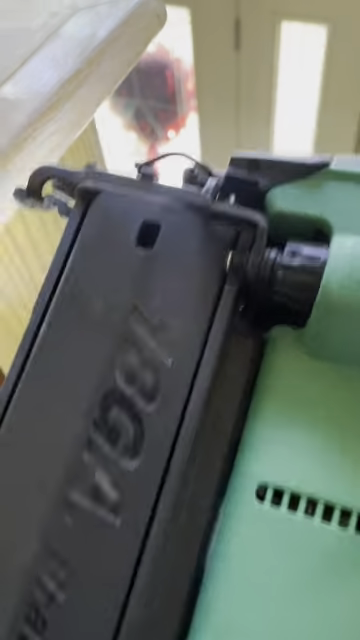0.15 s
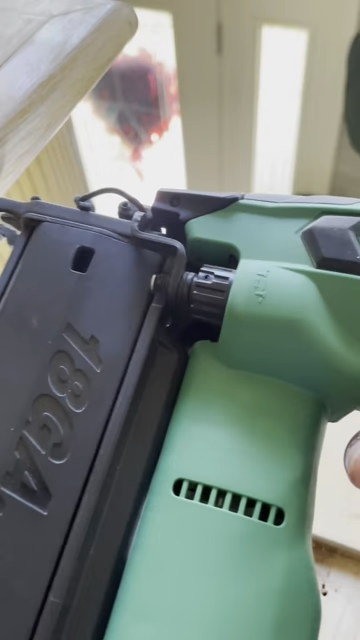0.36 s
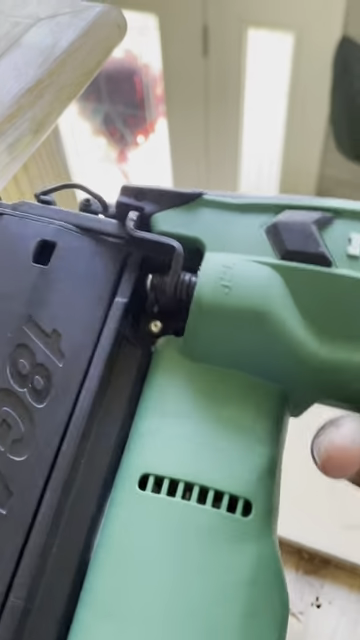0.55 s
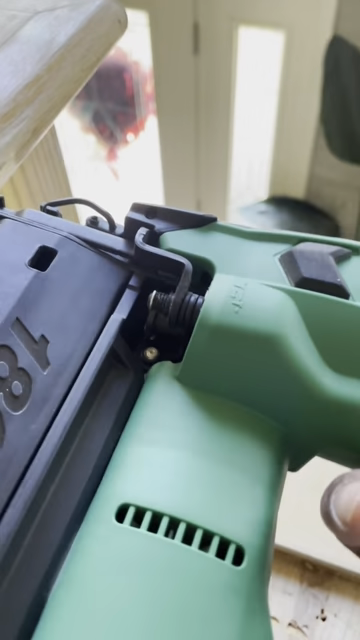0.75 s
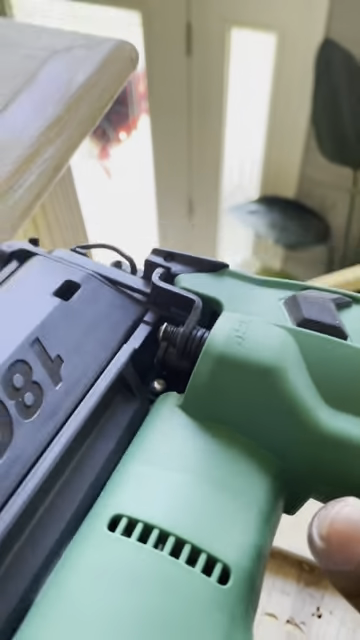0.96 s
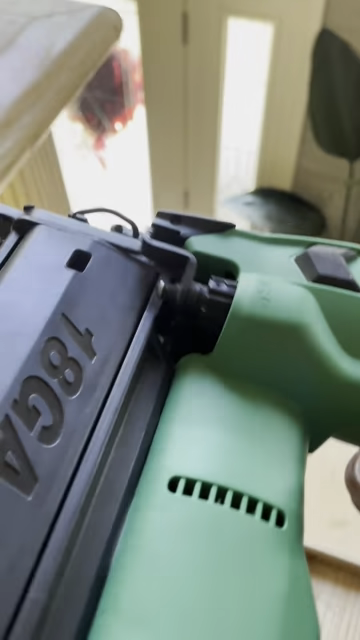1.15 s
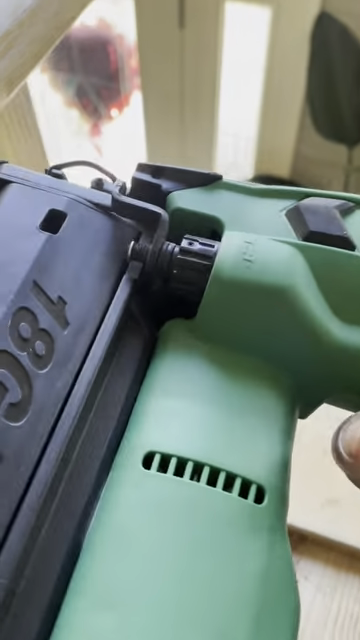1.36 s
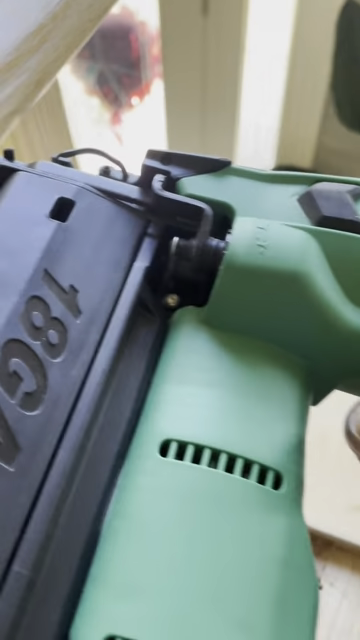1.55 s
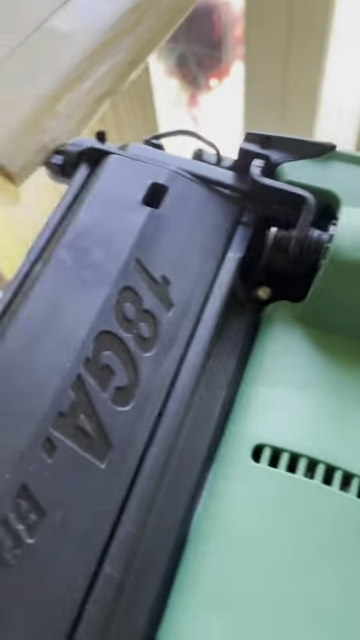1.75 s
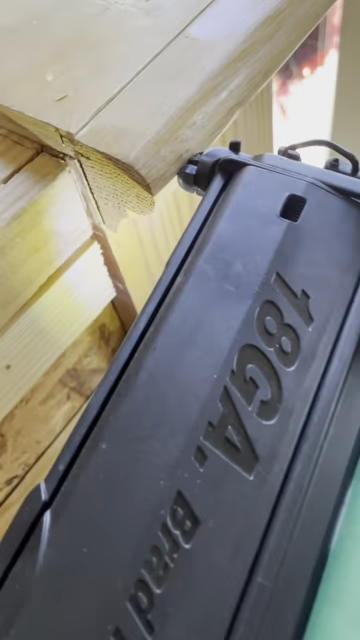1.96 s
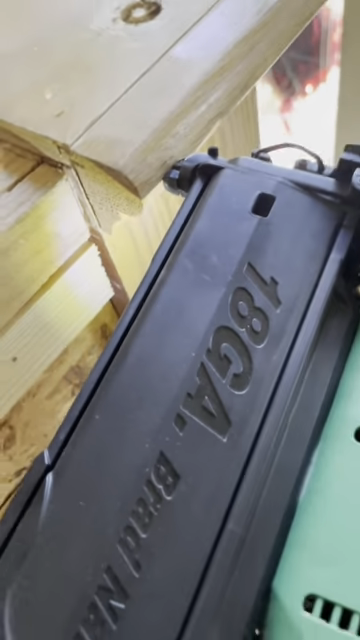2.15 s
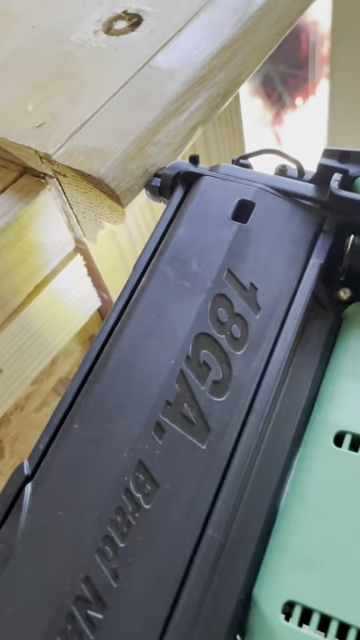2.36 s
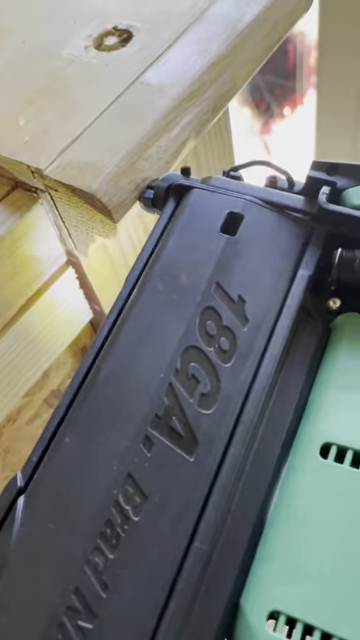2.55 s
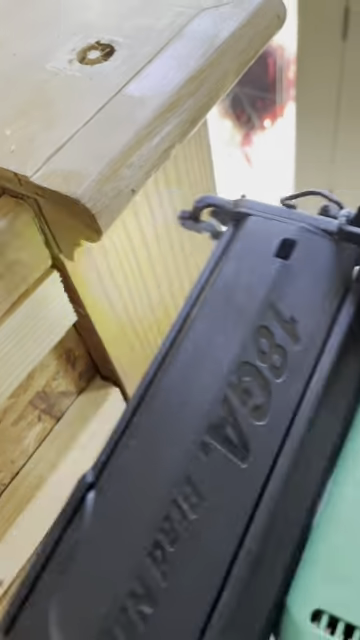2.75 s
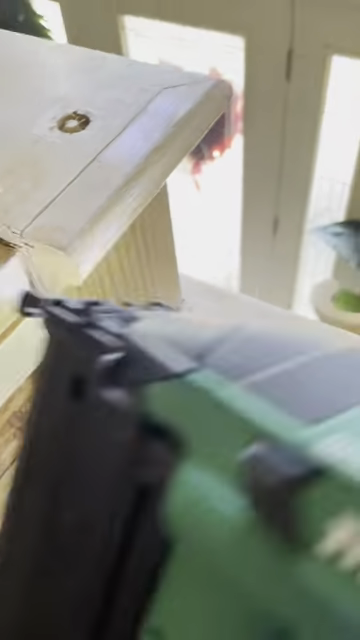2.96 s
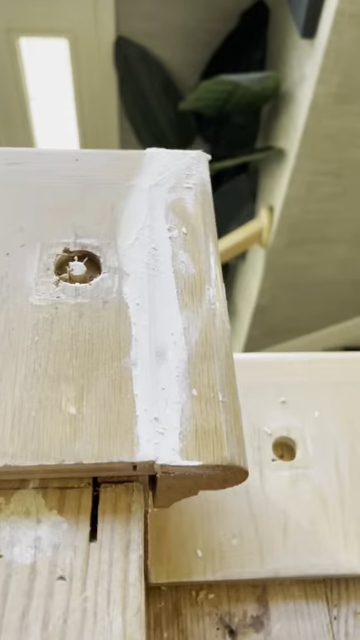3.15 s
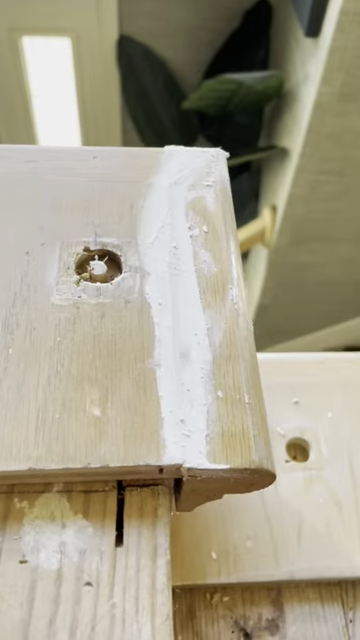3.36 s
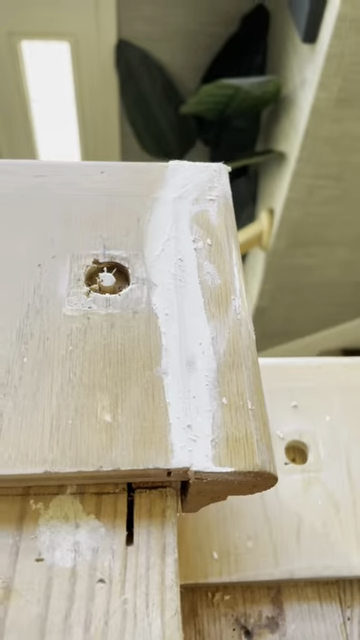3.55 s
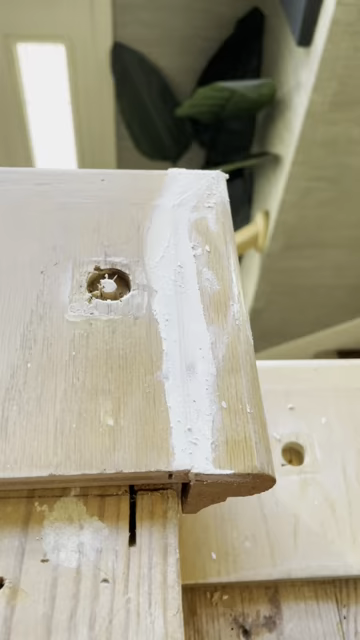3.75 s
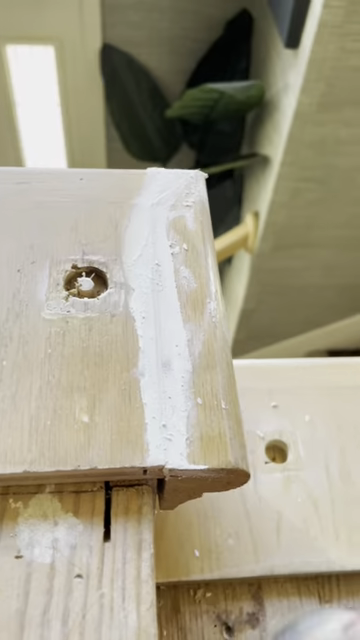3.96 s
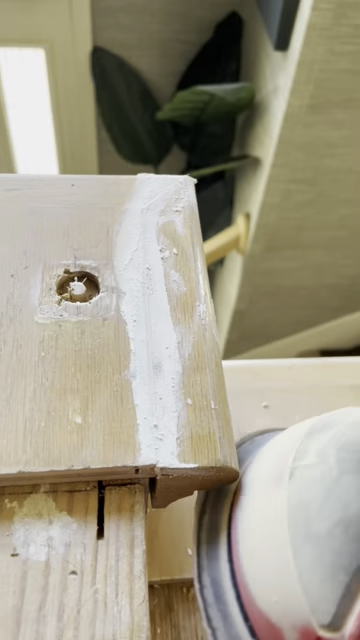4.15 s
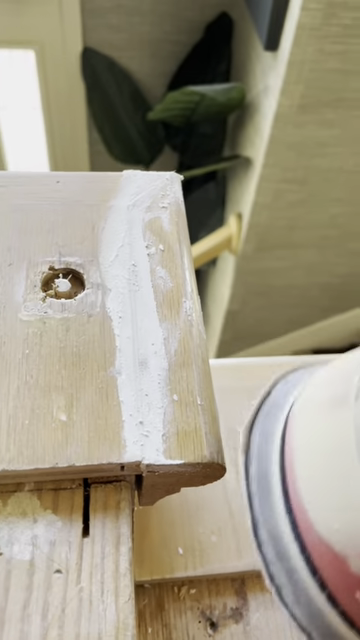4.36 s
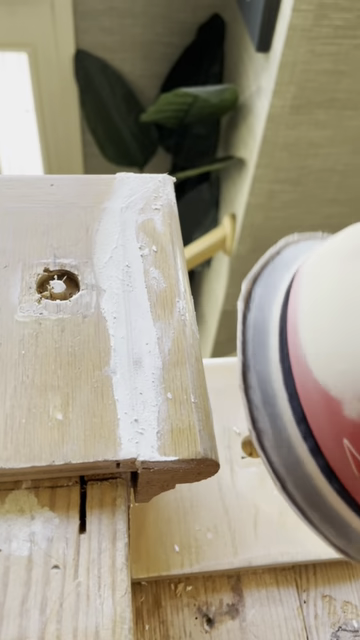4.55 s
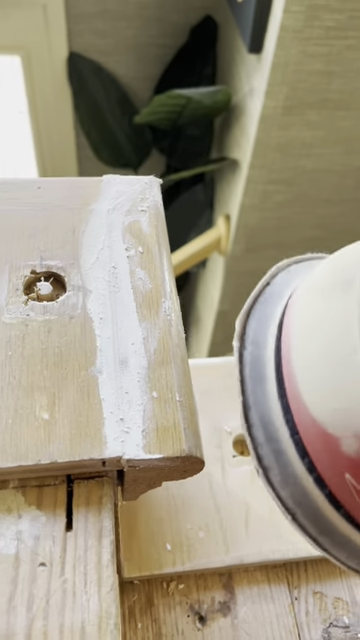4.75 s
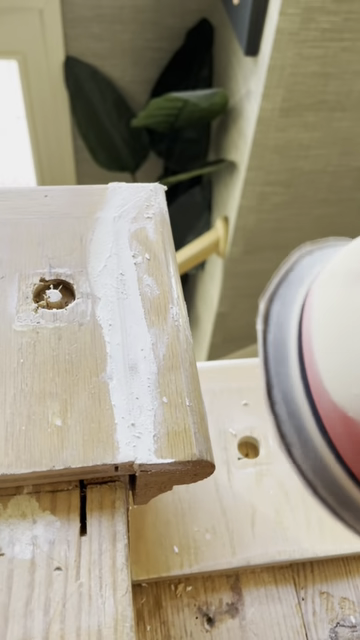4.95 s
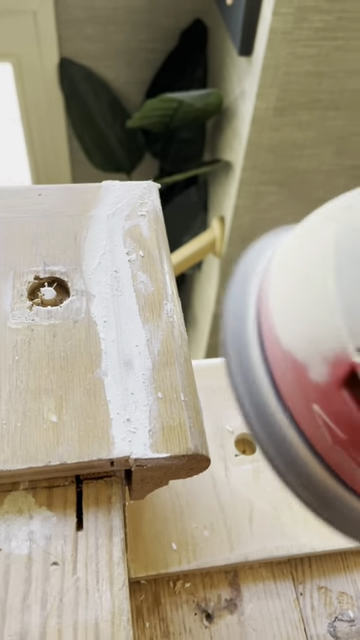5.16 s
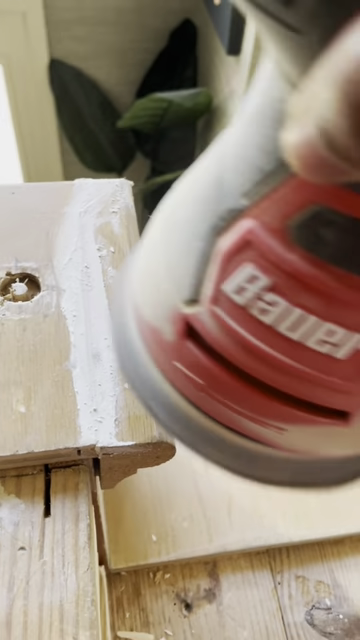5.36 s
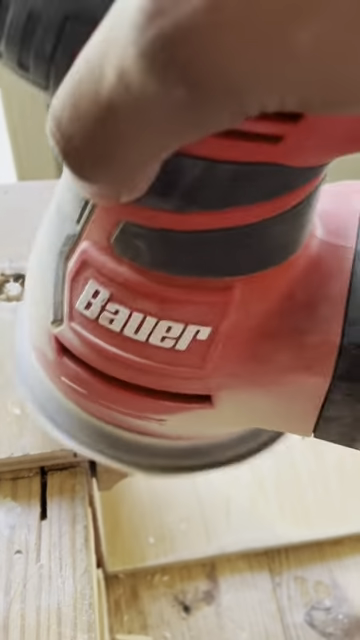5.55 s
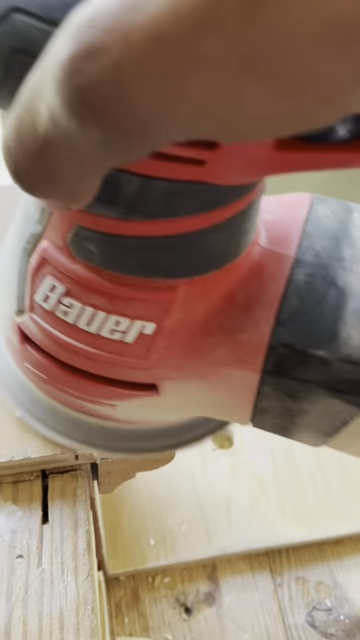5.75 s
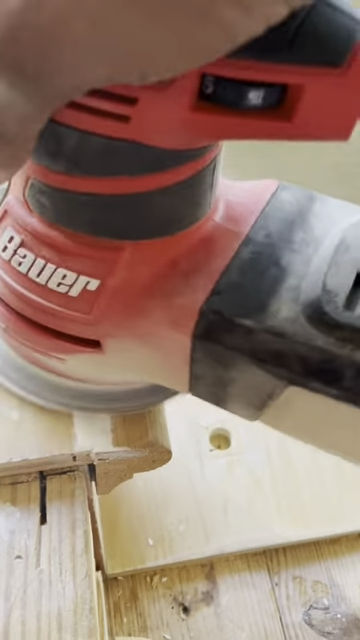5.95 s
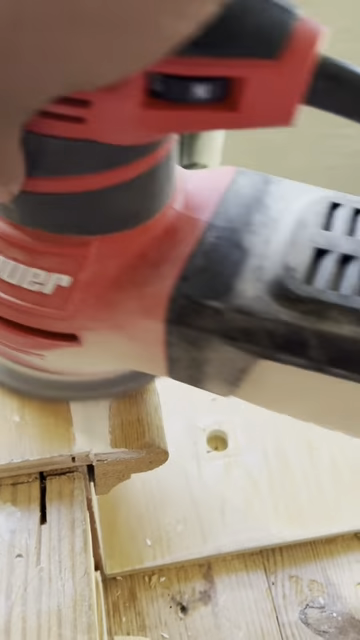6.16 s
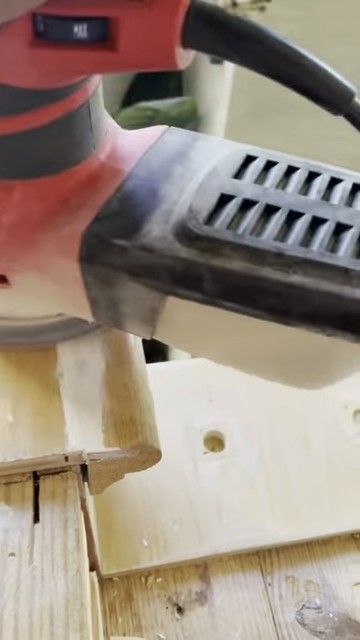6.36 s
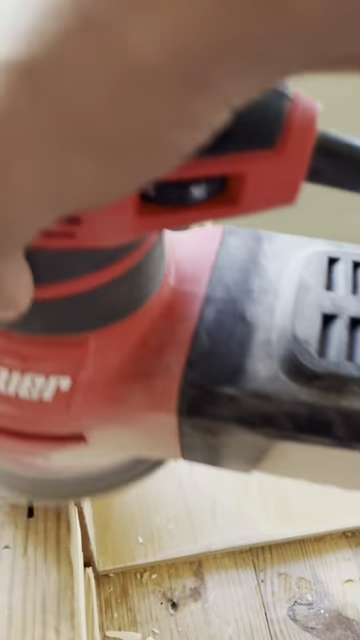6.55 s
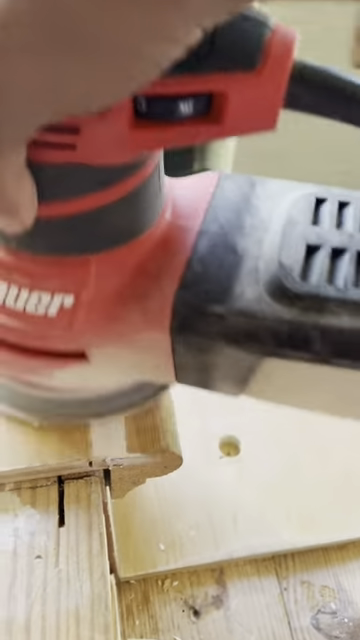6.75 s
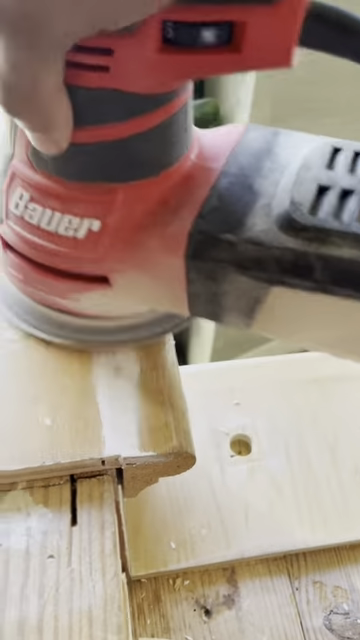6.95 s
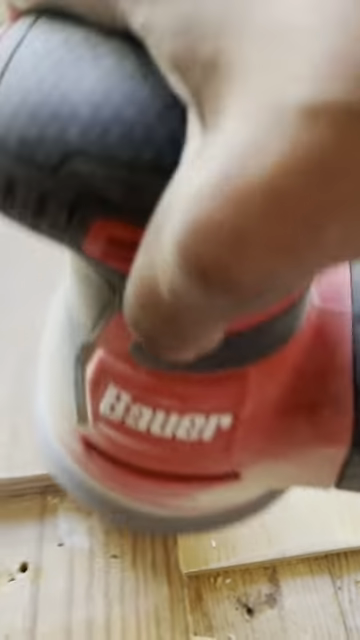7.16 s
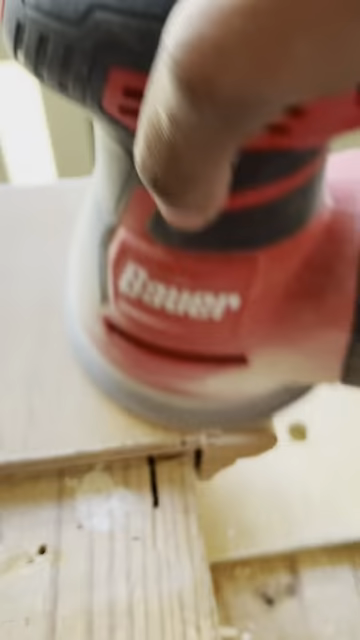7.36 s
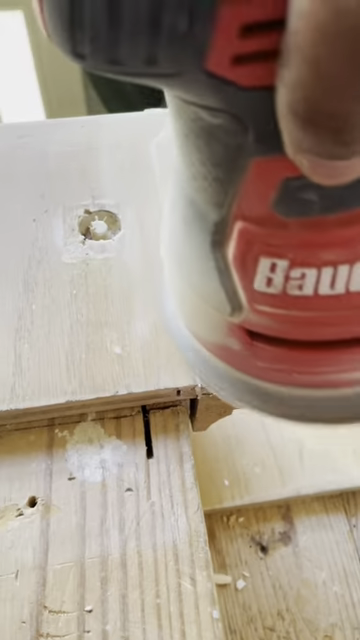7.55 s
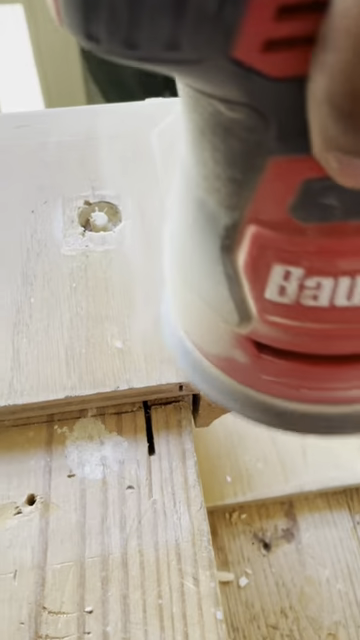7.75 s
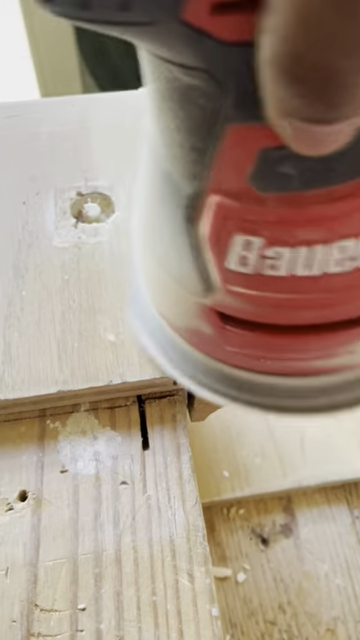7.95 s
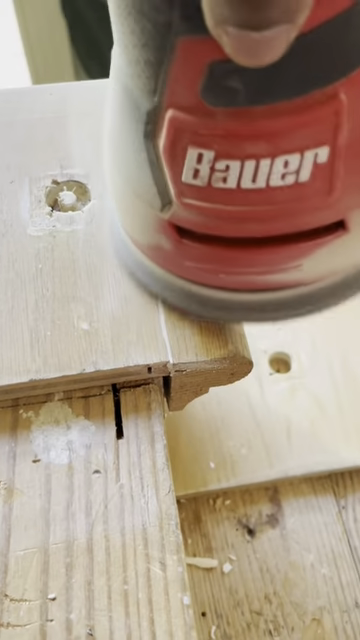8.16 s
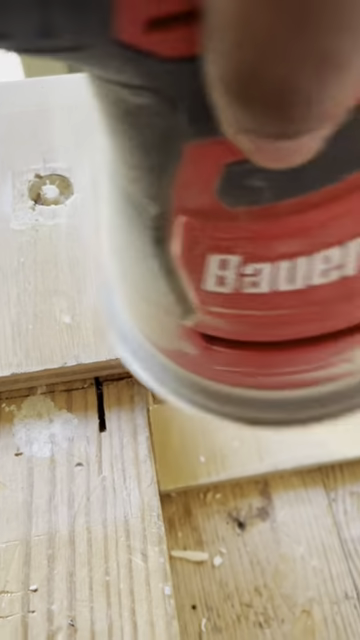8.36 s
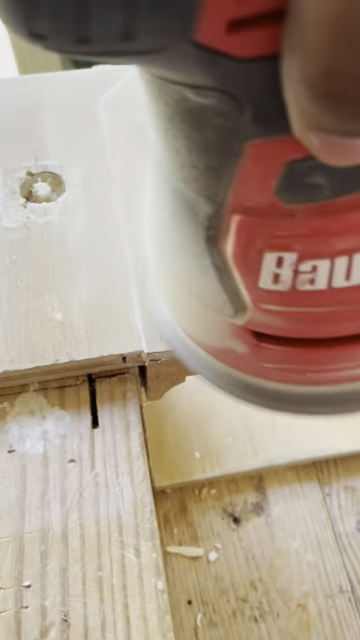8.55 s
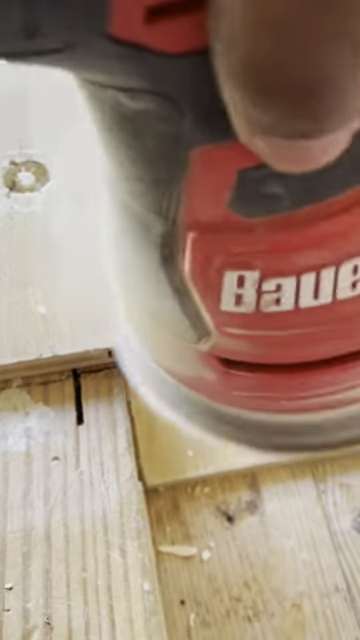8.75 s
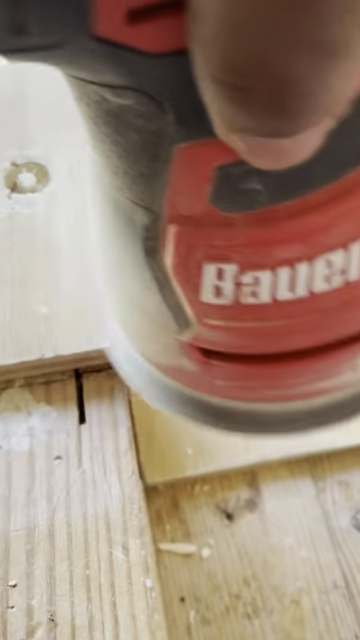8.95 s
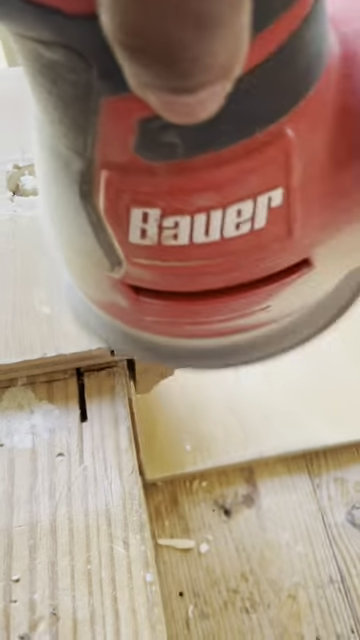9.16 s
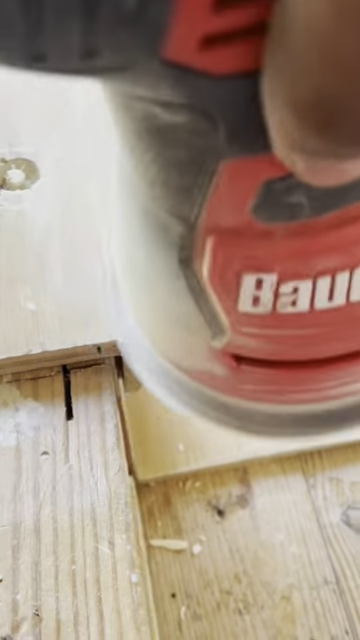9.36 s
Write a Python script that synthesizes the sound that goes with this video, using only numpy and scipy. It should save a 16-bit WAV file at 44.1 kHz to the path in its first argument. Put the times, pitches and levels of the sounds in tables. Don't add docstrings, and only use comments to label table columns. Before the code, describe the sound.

Plastic tool clicks, scrapes and one sharp knock on wood, a near-silent pause, then an electric sander spins up and buzzes steadily to the end.

```python
import sys
import numpy as np
from scipy import signal
from scipy.fft import rfft, irfft
from scipy.io import wavfile
from scipy.ndimage import uniform_filter1d

SR = 44100
rng = np.random.default_rng(int(sys.argv[2]) if len(sys.argv) > 2 else 0)


def transcribe(signal):
    frames = np.atleast_2d(signal).T
    limited = np.clip(frames, -1, 1)
    pcm = np.round(limited * 32767).astype(np.int16)
    wavfile.write(sys.argv[1], SR, pcm)


def ratio_of_db(decibels):
    return 10 ** (np.asarray(decibels, float) / 20)


N = 414540
T = np.arange(N) / SR
SIZE = 16384
STEP = 64
JOIN_S = 7.43


def evened(x):
    return x / np.sqrt(np.mean(x ** 2) + 1e-20)


def read(points, hz):
    f, value = np.transpose(points)
    return np.interp(np.log(hz + 1), np.log(f + 1), value)


def coloured(white, spectrum, lumps_db=0):
    hz = np.fft.rfftfreq(white.shape[-1], 1 / SR)
    octaves_below = np.maximum(np.log2(spectrum[0][0] / (hz + 1)), 0)
    octaves_above = np.maximum(np.log2((hz + 1) / spectrum[-1][0]), 0)
    shape_db = read(spectrum, hz) - 17 * (octaves_below + octaves_above) + lumps_db
    return evened(irfft(rfft(white) * ratio_of_db(shape_db), white.shape[-1]))


def stereo_noise(length=N):
    return rng.standard_normal((2, length))


def drift(hz, count, t=T):
    steps = rng.standard_normal((count, 4000))
    smooth = signal.sosfiltfilt(signal.butter(2, hz, fs=400, output="sos"), steps)
    return np.array([np.interp(t * 400, np.arange(4000), evened(row)) for row in smooth])


# (frequency [Hz], phase [rad])
LEAD = [(0, 0), (2000, .1), (3000, .9), (4200, 1.1), (4700, 2.3), (5250, 6.3), (9900, 9.42), (14600, 12.5)]
# (frequency [Hz], likeness [0-1])
SAME = [(60, 0.93), (250, 0.99), (500, 0.16), (1000, 0.83), (1800, 0.73), (3000, 0.98), (4700, 0.6),
        (5600, 0.92), (8000, 1), (10000, 0.095), (12500, 0.92), (14800, 0.88)]
# (frequency [Hz], level [dB])
LEAN = [(60, -2.5), (110, -3), (200, 2.0), (380, 5.5), (700, -5.5), (1290, 3.5), (2380, -0.5), (4400, -1.5),
        (8120, 0.0), (15000, 0.0)]


def ports(x, same=SAME):
    hz = np.fft.rfftfreq(N, 1 / SR)
    spread = np.arccos(np.clip(read(same, hz), 0, 1)) / 2
    direct, walls = rfft(x) * [np.cos(spread), np.sin(spread)]
    turn = np.exp(.5j * np.interp(hz, *np.transpose(LEAD))) * ratio_of_db(read(LEAN, hz) / 2)
    return irfft([(direct + walls) * turn, (direct - walls) / turn], N)


def swell(db, rise, fall, tail_db=-28.5, tail_t60=0.91):
    t_ms = (np.arange(SIZE) - SIZE // 2) / SR * 1000
    away = np.where(t_ms < 0, -t_ms / max(rise, 1), t_ms / max(fall, 1))
    peak = ratio_of_db(-9.0 * (np.sqrt(away ** 2 + 0.67) - 0.54))
    tail = ratio_of_db(tail_db - 60 * t_ms / 1000 / tail_t60) * (t_ms > 0)
    return ratio_of_db(db) * np.maximum(peak, tail) * np.hanning(SIZE)


def add(mix, s, sound):
    part = mix[:, round(s * SR):][:, :SIZE]
    part += sound


# (frequency [Hz], density [dB per Hz])
ROOM = [(18, -46), (30, -6.5), (79, 14.5), (666, -21.5), (1960, -30), (3980, -18.5), (9460, -51),
        (14400, -33.5), (16000, -47.5)]
# (time [s], level [dB])
SHUFFLE = [(0.0, -56.5), (1.2, -88), (1.38, -57), (1.66, -76), (1.75, -88), (2.0, -88), (2.4, -84),
           (2.47, -72.5), (2.59, -52), (2.78, -98.5), (4.13, -67), (4.54, -80), (4.9, -80)]


def room():
    tone = ratio_of_db(-72.5 + 3.0 * drift(6, count=1)) * coloured(stereo_noise(), ROOM)
    level_db = np.interp(T, *np.transpose(SHUFFLE)) + 2.6 * drift(15, count=1)
    cloth = [(120, 7), (500, 8.0), (1300, 2.5), (4000, -8.5), (5500, -20), (15500, -30)]  # (Hz, dB per Hz)
    return tone + ratio_of_db(level_db) * coloured(stereo_noise(), cloth)


# (frequency [Hz], density [dB per Hz])
CASING = [(600, 0), (800, 9), (1300, 4.5), (2000, 2.5), (3200, -3), (3800, -3.5)]
# (frequency [Hz], density [dB per Hz])
SCRATCH = [(3800, 0), (4800, 2), (6000, 4), (8000, 3.5), (11500, 0.5), (14300, 2), (16000, 2.5)]
# (frequency [Hz], density [dB per Hz])
HOLLOW = [(150, 1), (270, 7), (380, 3), (480, 1), (600, -2.5)]
# (time [s], peak level [dB], length [ms per 6 dB], treble [dB])
CLICKS = [(.089, -30.5, 8.5, 2), (.189, -66, -2, 11), (.301, -41, 8, 1), (1.216, -35, 12, 0),
          (1.251, -41.5, 12, -8), (1.376, -43, 7, -15), (1.427, -35.5, 12, -7), (2.413, -60, 7.5, -12.5),
          (2.479, -18, 10, -2), (2.499, -14, 5.5, -4), (2.586, -32, 22, -5.5), (2.651, -47, 26, -18.5),
          (3.489, -55.5, 17.5, -28.5), (3.624, -72.5, 41.5, 11), (4.936, -46.5, 8, 16)]
# (time [s], peak level [dB], length [ms per 6 dB], treble [dB])
KNOCKS = [(.049, -57, 20.5, -8), (.277, -43, 7.5, -18), (.395, -39.5, 7.5, -3.5), (.89, -50, 5, -1),
          (.98, -48, 9.5, -4.5), (1.165, -45.5, 25, -18), (1.283, -45, 7, -7), (1.325, -41, 5.5, -5),
          (1.475, -52, 14.5, -13), (1.878, -72, 11.5, 26), (3.128, -46, 10, -12.5), (3.268, -73, 32.5, -3),
          (3.37, -72.5, 27, 13), (3.42, -61, 15, 2), (3.874, -65.5, 20, 0), (3.985, -62.5, 34, -8),
          (4.198, -64.5, 9.5, 10), (4.753, -61, 11, -18)]
# (time [s], peak level [dB], length [ms per 6 dB], treble [dB])
BUMPS = [
    (.461, -50.5, 28.5, -28),
    (.523, -36.5, 15.5, -23),
    (.58, -56, 49, -15),
    (.861, -62.5, 20, -15),
    (.915, -65, 10, -13),
    (1.541, -45.5, 17.5, -24),
    (3.764, -62.5, 16, -12.5),
    (3.807, -67.5, 15, -4),
    (4.134, -53.5, 9.5, -14),
]
# (time [s], peak level [dB], length [ms per 6 dB], treble [dB])
SCRAPES = [
    (.503, -41.5, 21, -17),
    (1.502, -44.5, 22.5, -16),
    (2.728, -49, 37, -2),
    (3.125, -38.5, 8, -5),
    (4.099, -43, 13.5, -7),
    (4.309, -49, 29, -18.5),
    (4.634, -71.5, 13.5, 4),
]
# (table, rise [share of length], fall [share of length], hollow body [dB])
KINDS = [(CLICKS, 0.79, 0.87, -15), (KNOCKS, .65, 1.2, 0.42), (BUMPS, .6, 1.1, 10.5), (SCRAPES, 0.71, 0.3, -1.1)]


def scuffs(lumps_db=2.5):
    out = np.zeros((2, N + SIZE))
    for table, rise, fall, hollow_db in KINDS:
        for s, db, length, treble_db in table:
            white = stereo_noise(SIZE)
            patch = uniform_filter1d(rng.standard_normal(SIZE // 2 + 1), 60)
            patch = evened(uniform_filter1d(patch, 60))
            lumps = lumps_db * np.clip(-db / 36, 0, 1) * patch
            layers = [(CASING, 0), (SCRATCH, treble_db), (HOLLOW, hollow_db)]
            noise = sum(ratio_of_db(level) * coloured(white, colour, lumps) for colour, level in layers)
            add(out, s, swell(db, rise * length, fall * length) * noise)
    return out[:, SIZE // 2:SIZE // 2 + N]


# (time [s], peak level [dB], frequency [Hz], t60 [s])
THUDS = [(0.079, -52, 69.6, 0.38), (0.279, -57, 91, 0.13), (0.516, -27, 108, 0.16),
         (0.574, -34.5, 92, 0.19), (0.899, -33.5, 100, 0.053), (1.537, -30, 78.5, 0.25),
         (2.506, 2, 95.4, 0.024), (2.541, -32, 58.1, 0.35), (3.118, -35, 100.8, 0.0695),
         (3.481, -49, 99.8, 0.36), (3.76, -41, 74.5, 0.26), (4.099, -41, 70, 0.34),
         (4.137, -43, 117.4, 0.17)]


def thuds(push_db=-5.5):
    out, t = np.zeros(N + SR), np.arange(SR // 2) / SR
    for s, db, hz, t60 in THUDS:
        turns = hz * (t + 0.0047 * (1 - np.exp(-t / 0.0085)))
        ring = np.sin(2 * np.pi * turns)
        heave = ratio_of_db(push_db) * np.sin(2 * np.pi * .45 * turns)
        onset = 1 - np.exp(-t / 0.0017)
        at = round(s * SR)
        out[at:at + len(t)] -= ratio_of_db(db - 60 * t / t60) * onset * (ring + heave)
    return out[:N]


# (time [s], peak level [dB], length [ms per 6 dB], frequency [Hz])
RINGS = [(.09, -35.5, 7.5, 2440), (.575, -61, 13, 7000), (0.888, -46, -5, 5740), (1.215, -43, 11, 940),
         (1.22, -47, 24, 6000), (1.18, -44.5, 27, 270), (1.261, -44.5, 35, 290), (1.331, -46, 24, 290),
         (1.471, -44.5, 32, 296), (1.425, -32.5, 2.5, 5950), (1.425, -38, 4, 7240), (1.508, -49, 14, 5900),
         (1.88, -54.5, 8, 850), (1.88, -40, 4, 14000), (2.6, -51.5, 4.3, 1100), (2.483, -9.5, 3, 3090),
         (2.591, -31, 6, 1870), (2.57, -38, 10, 6000), (3.212, -61, 2, 3540), (3.127, -33, 4, 249.4),
         (3.743, -36, 7.5, 330), (3.765, -61, 12, 2090), (4.311, -53, 7, 1400), (3.12, -42, 10, 997),
         (4.634, -56.5, 8.5, 753), (4.754, -53.5, 7, 1170), (4.936, -30.5, 9.5, 720),
         (4.985, -25.5, 27, 2080), (2.471, -17, 6, 1150), (2.485, -19, 4, 1650), (2.473, -19, 5, 2850),
         (4.09, -40, 5, 530), (4.2, -57, 5, 4000), (3.98, -57, 7, 400), (3.875, -62, 4, 1950),
         (2.502, -15, 4, 400), (2.5, -18, 3, 900), (1.878, -56, 9, 5500), (1.865, -66, 12, 3200),
         (1.542, -52, 8, 6000), (2.495, -27, 6, 4300), (.29, -52, 8, 4100)]


def rings():
    out = np.zeros((2, N + SIZE))
    f = np.fft.rfftfreq(SIZE, 1 / SR)
    for s, db, length, hz in RINGS:
        width_hz = 1.7 * hz ** .68
        ring = irfft(rfft(stereo_noise(SIZE)) / (1 + (2 * (f - hz) / width_hz) ** 2))
        add(out, s, swell(db, 0.71 * length, 1.2 * length) * evened(ring))
    return out[:, SIZE // 2:SIZE // 2 + N]


PULL_END_S, PULL_FADE_S = 5.55, 0.11


def pulling(t):
    return np.clip((PULL_END_S - t) / PULL_FADE_S, 0, 1)


# (time [s], turn [half turns])
PAD = [(5.45, 0), (5.642, 1), (5.943, 4), (6.26, 7), (6.58, 11), (6.68, 12), (7.0, 15), (7.23, 16),
       (7.521, 19), (8.5, 26.7), (9.08, 30.62), (9.4, 33.05)]


def pad_angle(t):
    return np.pi * np.interp(t, *np.transpose(PAD))


THROB_LAG = 2.0
# (multiple of shaft speed, level [dB])
RATTLE = [(1, 0), (2, -13.5), (3, -10), (4, -14.5), (5, -13.5), (6, -18), (7, -25), (8, -27), (9, -22.5),
          (10, -22), (11, -21.5), (11.45, -28), (12.53, -29), (13, -25.5), (14, -25.5), (15, -28),
          (16, -30), (17, -31), (18, -26.5), (19, -28.5), (20, -27.5), (21, -31.5), (22, -51), (23, -35),
          (24, -39), (25, -32.5), (26, -32.5), (27, -33), (28, -32), (29, -35), (30, -34.5)]
STEADY = [(2, 0), (3, .85), (4, .4), (5, .8), (7, .7), (9, .5), (11, .45), (14, .6), (19, .45), (23, .5)]
# (frequency [Hz], level [dB])
BODY = [(200, -13), (480, -9), (640, -5.5), (800, 9), (1300, -7.5), (2100, 1), (3500, 3), (5200, 5)]
# (multiple of shaft speed, extra level [dB])
FREE = [(2, -4), (3, -0.5), (4, 7.5), (5, -5.5), (6, 2), (10, 1), (14, 7.5), (18, 3), (23, 1), (24, 11),
        (25, 3), (30, 3)]
# (time [s], loss per order [Hz])
SLIP = [(5.5, 0), (5.65, 4.6), (6.25, 4.6), (6.45, 2.6), (7.4, 2.6), (7.45, 2.1), (9.4, 2.1)]


def rattle(hz, shaft):
    t, hz = T[::STEP], hz[::STEP]
    pull, pad = pulling(t), pad_angle(t)
    rocking = t < JOIN_S
    tipped = np.clip((t - 8.32) / 0.062 + .5, 0, 1)
    rattle_db = 2 - 4.5 * pull - 1.5 * (t - 7.28) * rocking * (1 - pull)
    slip = 2 * np.pi * np.cumsum(np.interp(t, *np.transpose(SLIP))) * STEP / SR
    low_chatter_db = 5 * ~rocking * (1 - tipped) - 2 * tipped
    high_chatter_db = 5 * tipped + 3 * pull
    flare_db = 8 * np.exp(-((t - 7.355) / 0.04) ** 2)
    out, on = np.zeros(N, complex), T > 4.9
    for k, db in RATTLE[1:]:
        whole = k % 1 == 0
        start, late = rng.uniform(0, 1, 2)
        steady = read(STEADY, k)
        held = .5 * rocking * (k > 7) if whole else 1
        steady = steady + (1 - steady) * np.maximum(pull, held)
        if k == 2:
            beat = np.sin(pad)
        elif k < 8:
            beat = np.cos(2 * pad - .5 * late)
        else:
            beat = np.cos(4 * pad - THROB_LAG - .5 * late)
        loose, wander = drift(18, count=2, t=t) * np.sqrt(k)
        size = steady + (1 - steady) * 1.3 * beat + .05 * loose
        size -= .15 * rocking * (2 < k < 8) * np.maximum(loose, 0)
        size -= .45 * (k == 3) * rocking * (1 - pull) * beat
        mood_db = read(FREE, k) * pull + 2.5 * (k == 6) * rocking + (k == 2) * flare_db
        body_db = read(BODY, k * hz) - read(BODY, k * hz[-1])
        near_low = np.exp(-((k - 10.5) / 1.5) ** 2)
        near_high = np.exp(-((k - 20) / 2.5) ** 2)
        chatter_db = near_low * low_chatter_db + near_high * high_chatter_db
        size *= ratio_of_db(-19.5 + db + rattle_db + body_db + chatter_db + mood_db)
        slipping = k * np.clip((k - 6) / 5, 0, 1) * slip * whole
        lag = 2 * np.pi * start + .04 * wander - slipping
        phase = k * shaft[on] + np.interp(T[on], t, lag)
        out[on] += np.interp(T[on], t, size) * np.exp(1j * phase)
    return out.real, out.imag


# (frequency [Hz], density [dB per Hz])
AIR = [(30, -27.5), (70, -15.5), (200, 1.5), (330, 0.5), (550, -2), (1700, -1.5), (2100, 2.5), (2550, -2),
       (3200, -3), (4300, -6.5), (5300, -4.5), (8000, -7.5), (11000, -7), (13200, -16), (14300, -4),
       (16500, -26)]


def fan_air(air_db, shaft):
    gusts_db = 0.71 * drift(37, count=1)
    gusts_db = gusts_db + 0.097 * np.cos(4 * pad_angle(T) - THROB_LAG) + 0.33 * np.cos(shaft)
    return ratio_of_db(air_db + 1.5 + gusts_db) * coloured(stereo_noise(), AIR)


# (frequency [Hz], width [Hz], level [dB])
HOUSING = [
    (766, 160, 10.5),
    (912, 280, 17),
    (1090, 610, 11),
]


def housing_roar(air_db):
    f = np.fft.rfftfreq(N, 1 / SR)
    walls = sum(ratio_of_db(db) / (1 + (2 * (f - c) / width) ** 2) for c, width, db in HOUSING)
    level_db = air_db - 1.54 + 0.83 * drift(33, count=1)
    return ratio_of_db(level_db) * evened(irfft(rfft(stereo_noise()) * walls, N))


# (frequency [Hz], density [dB per Hz])
RUMBLE = [(20, -5), (45, -1), (90, 1)]


def stair_rumble():
    heave = ratio_of_db(-50.5) * pulling(T) ** 3 + ratio_of_db(-63 + 5 * (T - JOIN_S)) * (T > JOIN_S)
    return heave * coloured(stereo_noise(), RUMBLE)


# (frequency [Hz], level [dB])
SHELL = [(900, -66), (1600, -46), (1950, -32), (2350, -41), (2700, -45), (3500, -45.5), (5260, -38),
         (10500, -44.5)]
# (order, level [dB], extra under strain [dB], strain end [s], fade [s])
WHINE = [
    (12, -2, 16, 5.47, .15),
    (24, -5, 44, 5.12, .045),
    (36, -4, 0, 5.5, .1),
    (48, 0, 0, 5.5, .1),
]


def commutator_whine(hz, shaft):
    out = np.zeros(N)
    asleep_db = -26 * np.clip(1 - (T - PULL_END_S) / 1.9, 0, 1)
    brushes = (1 + .65 * np.cos(shaft)) * np.clip((T - 4.985) / .02, 0, 1)
    for (k, db, strain_db, end, fade), upper in zip(WHINE, (False, True, True, True)):
        loose, wander = drift(60, count=2)
        strain = np.clip((end - T) / fade, 0, 1)
        level_db = db + read(SHELL, k * hz) + strain_db * strain + upper * asleep_db
        out += ratio_of_db(level_db) * (1 + .25 * loose) * brushes * np.cos(k * shaft + .45 * wander)
    return out


# (time [s], shaft speed [Hz], shake level [dB], air and grit level [dB])
RUN = [(4.95, 36.01, -62, -37), (4.992, 82.9, -23.5, -32.5), (5.042, 122.5, -14.5, -28.5),
       (5.07, 137.8, -14, -25), (5.106, 155.2, -14, -24), (5.14, 165.2, -15.5, -26.5),
       (5.19, 185.5, -11.5, -25), (5.3, 204.3, -10, -22), (5.504, 220, -13, -26.5), (5.65, 220.1, -14, -26),
       (5.871, 218.9, -13.5, -28), (6.42, 216.8, -15, -29), (6.598, 218.7, -19, -28),
       (7.118, 217.8, -15, -29), (7.296, 218.3, -22.5, -27), (7.339, 217, -16, -29),
       (7.6, 219.7, -15.5, -29), (9.4, 219, -14, -27.5)]


def sander():
    s, *columns = np.transpose(RUN)
    hz, shake_db, air_db = (np.interp(T, s, c) for c in columns)
    hz = uniform_filter1d(hz, size=1200)
    switch = np.clip((T - 4.925) / 0.035, 0, 1) ** 2
    shaft = 2 * np.pi * np.cumsum(hz + 0.35 * drift(19.1, count=1)[0]) / SR
    shake = ratio_of_db(shake_db + .3 * drift(30, count=1)[0]) * np.cos(shaft)
    chatter, thrown_back = rattle(hz, shaft)
    noise = fan_air(air_db, shaft) + housing_roar(air_db) + stair_rumble()
    direct = shake + chatter + commutator_whine(hz, shaft)
    tones = np.sqrt(2) * np.array([direct, thrown_back]) * switch
    tone_likeness = [(250, 0.93), (430, 0.78), (900, 0.91), (1500, 0.99)]  # (Hz, 0-1)
    return ports(tones, same=tone_likeness) + ports(noise * switch)


def scene():
    handling = ports(room() + scuffs() + rings()) + thuds()
    return handling + sander() * (T > 4.8)


def low_pass(x):
    return signal.sosfilt(signal.butter(12, 17070, fs=SR, output="sos"), x)


# (frequency [Hz], gain)
SUM_BANDS = [(0, 1), (8400, 1), (9000, .3), (9350, .01), (10800, .01), (11100, .25), (11700, 1), (15700, 1),
             (15800, 0), (SR / 2, 0)]


def record(dry):
    cut_s, join_half_s = 3.132, .035
    cut = np.where(T > cut_s, np.clip((T - cut_s - .02) / .04, .01, 1), 1)
    join = np.clip(abs(T - JOIN_S) / join_half_s, .03, 1)
    mid, side = (dry[0] + dry[1]) / 2, (dry[0] - dry[1]) / 2
    sum_filter = signal.firwin2(801, *np.transpose(SUM_BANDS), fs=SR, window=("kaiser", 8))
    mid = signal.oaconvolve(mid, sum_filter, "same")
    side_filter = signal.firwin(801, [1550, 1950, 14500], fs=SR)
    side = signal.oaconvolve(side, side_filter, "same")
    side = signal.sosfiltfilt(signal.butter(4, 130, "high", fs=SR, output="sos"), side)
    return low_pass(np.array([mid + side, mid - side]) * cut * join)


dry = scene()
out = record(dry)
transcribe(out)
```